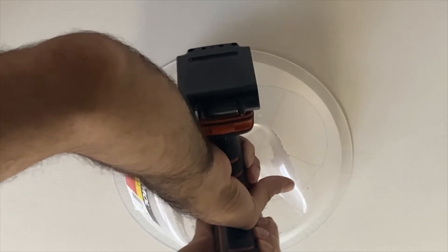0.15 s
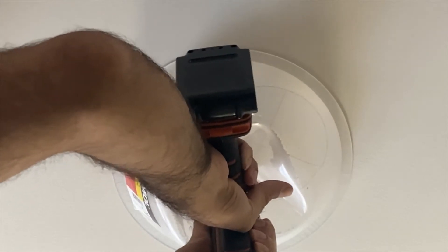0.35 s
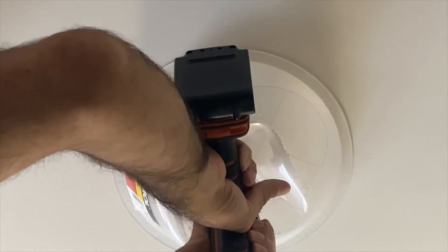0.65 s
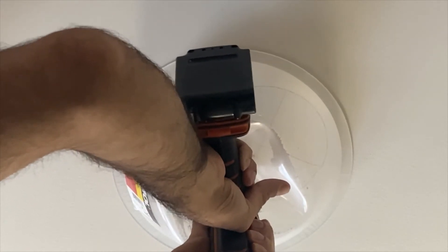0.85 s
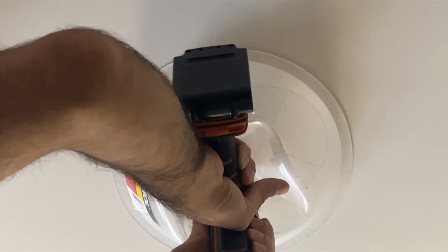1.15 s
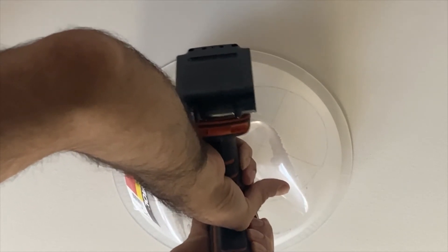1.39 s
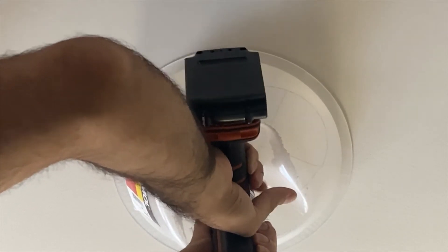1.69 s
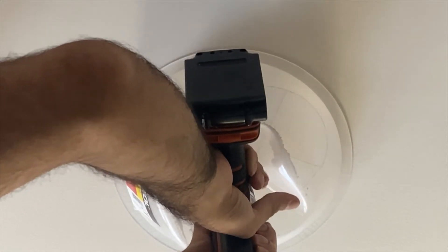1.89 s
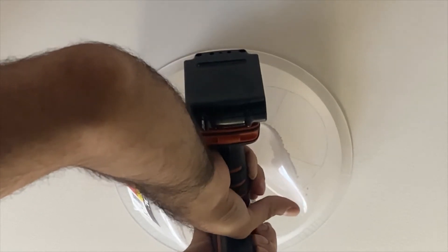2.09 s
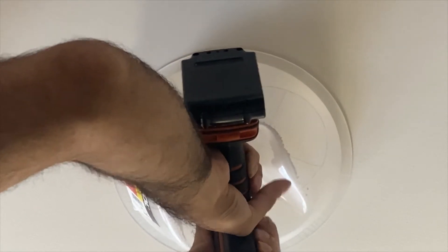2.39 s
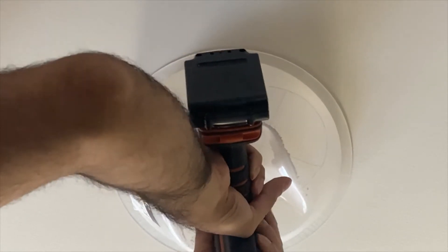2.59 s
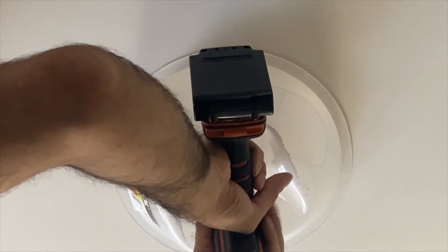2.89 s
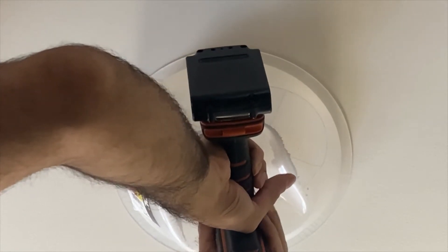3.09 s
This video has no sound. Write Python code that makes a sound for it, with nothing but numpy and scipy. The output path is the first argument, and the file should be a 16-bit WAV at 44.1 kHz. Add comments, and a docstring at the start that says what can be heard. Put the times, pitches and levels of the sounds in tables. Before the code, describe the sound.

A cordless drill grinds a hole saw through plasterboard, stops abruptly, then the tool ticks and clacks.

```python
"""Hole saw in a plasterboard ceiling

A cordless drill in a small hard room sags, picks up speed, grinds on and is braked; mono microphone.
Random tooth strikes make the scrape and ring the saw cup; tones locked to the shaft make the motor.
Short rattles ring the plastic as the tool ticks in the hand, and its switch clacks once.
Sparse decaying echoes give the room; shaped noise and fuzzy tones give its air and appliance hum."""
import sys
import numpy as np
from scipy import signal
from scipy.fft import rfft, irfft
from scipy.io import wavfile
from scipy.ndimage import uniform_filter1d

SR = 44100
rng = np.random.default_rng(int(sys.argv[2]) if len(sys.argv) > 2 else 0)


def output_pcm(signal):
    """Save a mono or channel-first signal as 16-bit PCM at the path in sys.argv[1].

    Samples are clipped to [-1, 1] before scaling.
    """
    pcm = np.clip(np.atleast_2d(signal).T, -1, 1) * 32767
    wavfile.write(sys.argv[1], SR, np.round(pcm).astype(np.int16))


def attenuation_scalar(level_db):
    """Turn a level in dB into a linear amplitude multiplier (20 dB per decade)."""
    decades = np.asarray(level_db, float) / 20
    return 10 ** decades


N = 143325
t = np.arange(N) / SR


def evened(x):
    """Scales x to rms 1."""
    return x / np.sqrt(np.mean(x ** 2) + 1e-20)


def read(points, hz):
    """Reads a spectrum table along a logarithmic frequency axis."""
    f, value = np.transpose(points)
    return np.interp(np.log(hz + 1), np.log(f + 1), value)


def curve(rows, at):
    """Reads a table of time and value along straight lines."""
    return np.interp(at, *np.transpose(rows))


def resonate(x, hz, width):
    """A resonance of the given width in Hz: shifts the curve hz down to zero, smooths, and shifts back."""
    turn = np.exp(2j * np.pi * np.cumsum(hz * np.ones(len(x))) / SR)
    r = np.exp(-np.pi * abs(width) / SR)
    return 2 * (turn * signal.lfilter([1 - r], [1, -r], x / turn)).real


def slow(top_hz):
    """Slow chance of rms 1: sines from 0.8 Hz to top_hz, weaker as they quicken."""
    rates = np.geomspace(.8, top_hz, num=16)
    return evened(sum(np.sin(2 * np.pi * (f * t + rng.random())) / np.sqrt(f) for f in rates))


def colour(x, points, db_field=0, size=512):
    """Shapes x by a spectrum and an optional dB field over frequency and time."""
    overlap = size * 3 // 4
    hz, at, z = signal.stft(x, SR, nperseg=size, noverlap=overlap)
    field = db_field(hz[:, None], at) if callable(db_field) else 0
    gain = attenuation_scalar(read(points, hz)[:, None] + field)
    return signal.istft(z * gain, SR, nperseg=size, noverlap=overlap)[1][:len(x)]


def drill():
    """Motor tones and cutting noise share one shaft speed and die away together under the brake."""
    # motor shaft speed: t/s, f/Hz
    shaft = [(0, 259.6), (.08, 198.1), (.12, 201.7), (.162, 289.1), (.22, 361.6), (.7, 367.6), (.9, 360),
             (1.1, 357), (1.3, 359.8), (1.575, 364.3), (1.63, 278)]
    stop_s, brake_s = 1.582, 0.018  # brake onset, time constant of the fading level
    reduction, turn_start = 36., 0.36  # motor turns per saw turn, saw angle before the start (turns)
    speed = curve(shaft, t)
    saw = turn_start + np.cumsum(speed) / SR / reduction
    on = np.exp(-np.maximum(t - stop_s, 0) / brake_s)
    return motor(speed, saw) * on, cutting(speed, saw) * on


def cutting(speed, saw):
    """Dense tooth strikes give a wide scrape and ring the saw cup; the bite varies round each turn."""
    # cutting effort: t/s, level/dB
    effort = [(0, -23.5), (.09, -28), (.18, -24.5), (.3, -25.5), (.4, -25.5), (.5, -25), (1.12, -24.5),
              (1.27, -25), (1.4, -24), (1.5, -24), (1.57, -26.5)]
    # spectrum of teeth scraping plaster: f/Hz, relative level/dB
    grind = [(53, -54), (90, -28.5), (176, -8.5), (296, -8.5), (438, -5), (606, -11), (721, -4.5),
             (1160, -4.5), (1750, 1.5), (2530, -2), (3150, 1), (4550, -7.5), (10400, -7.5), (13000, -11.5),
             (16000, -24)]
    # resonances of board, saw cup and dust bowl: f/Hz, width/Hz, relative level/dB
    body = [(179, 14, -7), (3060, 140, -5.5), (3400, 110, 4), (5165, 460, 3), (5390, 57, -5.5),
            (6270, 140, 2.5), (6610, 110, -6.5), (10400, 560, -3)]
    scrape_db, cup_db, turn_depth_db = -1, -10, 0.68
    teeth_per_s, tooth_spread_db = 10000, 2  # mean strike rate, scale of the random strike levels
    shallow_db, sink_s = 4, 0.3  # the cup rings less until the saw has sunk in
    patchy_db = 1.5
    dull_hz, dull_db_per_octave = 3960, 7  # treble lost above dull_hz if the motor stood still

    force = attenuation_scalar(tooth_spread_db * np.minimum(rng.exponential(1, N), 5))
    hit = rng.random(N) < teeth_per_s / SR
    strikes = force * rng.choice([-1., 1.], N) * hit

    def field(hz, at):
        """Patchy grain in time and frequency, with duller treble as the motor slows."""
        grain = rng.standard_normal((len(at), len(hz)))
        grain = uniform_filter1d(grain, size=9, axis=0)
        patches = evened(uniform_filter1d(grain, size=10, axis=1)).T
        slack = 1 - np.interp(at, t, speed) / speed.max()
        return patchy_db * patches - dull_db_per_octave * slack * np.log2(1 + hz / dull_hz)

    scrape = evened(colour(strikes, grind, field, size=1024))
    cup = 0
    for hz, width, db in body:
        wandering_hz = hz * (1 + 0.011 * slow(9.7))
        cup = cup + attenuation_scalar(db + 2.8 * slow(20)) * evened(resonate(strikes, wandering_hz, width))
    cup_level = attenuation_scalar(cup_db - shallow_db * np.exp(-t / sink_s))
    bite = attenuation_scalar(curve(effort, t) + turn_depth_db * np.sin(2 * np.pi * saw))
    return bite * (attenuation_scalar(scrape_db) * scrape + cup_level * evened(cup))


def motor(speed, saw):
    """Shaft orders, gear whines and a moan follow the speed; the ceiling panel shudders once per saw turn."""
    # how the grip lets the housing hum: t/s, shaft order level/dB, second order level/dB
    housing = [(0, -41.5, -54), (.07, -46, -61.5), (.135, -46.5, -59.5), (.165, -31.5, -57),
               (.195, -50, -51), (.23, -34, -37.5), (.35, -43, -39), (.41, -47.5, -50), (.48, -41.5, -41),
               (.8, -42.5, -41), (.88, -44, -50.5), (1.0, -44.5, -37), (1.08, -32.5, -43),
               (1.14, -39.5, -60.5), (1.301, -45, -51), (1.4, -42.5, -51.5), (1.53, -49, -37),
               (1.6, -46, -48.5)]
    # gear mesh whines: multiple of shaft speed, mean level at full speed/dB, width of each pass/Hz
    mesh = [(4.7, -43.5, 190), (5.03, -42, 110), (7.53, -36.5, 67), (8.55, -42.5, 62), (9.6, -41, 53)]
    # the whines between orders 7 and 8 come and go: t/s, added level/dB
    whine = [(.2, -3), (.55, 3), (.9, -2), (1.05, 5.5), (1.2, 4), (1.32, -5.5), (1.42, 0.5), (1.55, -5.5)]
    # moan at full speed, at the top of its swell: t/s, level/dB
    moan_level = [(.15, -38.5), (.3, -32), (.5, -35), (.65, -35.5), (1.08, -35), (1.35, -36), (1.5, -35.5)]
    # panel shudder at the top of its swell: t/s, level/dB
    shudder = [(0, -64.5), (.9, -76), (1.15, -51), (1.35, -46), (1.6, -44.5)]
    waver_db, speed_jitter, db_per_octave_of_speed = 2.5, .0015, 14.5  # jitter: rms share of speed
    moan_order, moan_sweep, moan_depth_db = 1.21, 0.066, 17.5  # sweep: share of the moan's pitch
    panel_hz, panel_width_hz = 63.5, 37

    turns = np.cumsum(speed * (1 + speed_jitter * slow(28))) / SR
    at, first, second = np.transpose(housing)
    out = 0
    for order, db in enumerate([first, second], start=1):
        level = attenuation_scalar(np.interp(t, at, db) + waver_db * slow(25))
        out = out + np.sqrt(2) * level * np.sin(2 * np.pi * order * turns)

    fast = attenuation_scalar(db_per_octave_of_speed * np.log2(speed / speed.max()))
    for order, db, width in mesh:
        level = attenuation_scalar(db + slow(9.8) + (7 < order < 8) * curve(whine, t))
        once = resonate(rng.standard_normal(N), order * speed, width)
        out += fast * level * evened(resonate(once, order * speed, width))

    # the pitch rises and the level swells once per saw turn
    moan = np.cumsum(moan_order * speed * (1 - moan_sweep * np.cos(np.pi * (saw % 1)))) / SR
    swell = np.sin(np.pi * saw) ** 2 - 1
    level = attenuation_scalar(curve(moan_level, t) + moan_depth_db * swell)
    out += fast * np.sqrt(2) * level * np.sin(2 * np.pi * moan)

    once = resonate(rng.standard_normal(N), panel_hz, panel_width_hz)
    panel = evened(resonate(once, panel_hz, panel_width_hz))
    return out + attenuation_scalar(curve(shudder, t) + 6 * swell) * panel


def ticks():
    """Rattles of clicks ring the plastic housing and snap wide; the switch latch's blows ring it cleanly."""
    # plastic ticks: t/s, relative level/dB, decay time constant/s, added snap level/dB
    tick_rows = [(2.15, -68.5, .012, 17), (2.391, -67, 0.018, 16), (2.416, -61, .03, -3),
                 (2.483, -69.5, .01, 14), (2.868, -47.5, 0.011, -2.5), (2.9235, -28.5, 0.011, 2.5),
                 (2.95, -36, 0.013, -2), (2.99, -47.5, 0.011, 1.5), (3.061, -50.5, .012, 4)]
    # modes of the plastic: f/Hz, relative level/dB, t60/s
    plastic = [(1085, -6.5, 0.016), (1656, -4, 0.025), (2350, -8, 0.012), (2930, 6, 0.0081),
               (3500, -4, .008)]
    # spectrum of the snap: f/Hz, relative level/dB
    snap_colour = [(300, -25), (1500, -4.5), (3200, -2.5), (4200, -10.5), (8000, -16), (16000, -26.5)]
    # the switch latch strikes and bounces: t/s, peak level/dB
    latch = [(2.926, -23.5), (2.9293, -24.5), (2.9337, -29.5), (2.9423, -33)]
    rattle_per_s, ring_db, crack_db = 2900, -10.5, -5
    rise_share = 0.29  # rise time as a share of the decay time constant

    rattle, bright = np.zeros(N), np.zeros(N)
    clicks = evened(rng.standard_normal(N) * (0.35 + (rng.random(N) < rattle_per_s / SR) * 2))
    for s, db, length, snap_db in tick_rows:
        u = np.maximum(t - s, 0) / length
        shape = attenuation_scalar(db) * np.minimum(u / rise_share, 1) * np.exp(-u)
        rattle += shape
        bright += attenuation_scalar(snap_db) * shape

    u = t[:2000]
    ring = sum(attenuation_scalar(db - 60 * u / t60) * np.sin(2 * np.pi * hz * u) for hz, db, t60 in plastic)
    blows = np.zeros(N)
    for s, db in latch:
        blows[round(s * SR)] = attenuation_scalar(db) / abs(ring).max()
    clack = signal.oaconvolve(blows, ring)[:N]
    rung = signal.oaconvolve(rattle * clicks, ring / np.linalg.norm(ring))[:N]
    snap = bright * evened(colour(clicks, snap_colour, size=128))
    return clack + attenuation_scalar(ring_db) * rung + attenuation_scalar(crack_db) * snap


def room(x):
    """Three sparse tails, each band dying at its own speed, fed in turn as hands and tool move."""
    # reverberation: f/Hz, t60/s
    decay = [(150, 0.62), (500, 0.77), (2000, 0.37), (5000, 0.37), (12000, 0.19)]
    shift_hz = 2.52  # how fast the feed moves between the tails
    at, out = np.arange(160, SR - 20, 20), 0  # one echo in every 20 samples
    for k in range(3):
        taps = np.zeros(SR)
        taps[at + rng.integers(0, 20, len(at))] = rng.choice([-1., 1.], len(at))
        hz, u, z = signal.stft(taps, SR, nperseg=256)
        tail = signal.istft(z * attenuation_scalar(-60 * u / read(decay, hz)[:, None]), SR, nperseg=256)[1]
        # the squares of the three feeds add up to 1
        feed = np.sqrt(2 / 3) * np.cos(np.pi * (shift_hz * t + k / 3))
        out = out + signal.fftconvolve(feed * x, tail / np.linalg.norm(tail))[:N]
    return out


def background():
    """Low room air as shaped noise, and appliance hum as steady tones mixed with narrow noise."""
    # spectrum of the room air: f/Hz, relative level/dB
    air = [(20, -20.5), (53, -4), (216, -6.5), (422, -13.5), (660, -16.5), (1610, -24.5), (1860, -22),
           (2080, -24.5), (12100, -45), (16000, -62.5)]
    # appliance hum: f/Hz, level before steady and fuzzy parts are mixed/dB
    hum = [(59.2, -53), (118.4, -61.5), (204.6, -58), (236.9, -66), (409.1, -65.5), (629.8, -69.5),
           (1873, -71.5)]
    air_db, hum_width_hz, hum_fuzz = -58, 7, .6  # hum_fuzz: amplitude share of the noise
    out = attenuation_scalar(air_db + 1.5 * slow(6.7)) * evened(colour(rng.standard_normal(N), air, size=4096))
    for hz, db in hum:
        fuzz = evened(resonate(rng.standard_normal(N), hz, hum_width_hz))
        steady = np.sqrt(2) * np.sin(2 * np.pi * (hz * t + rng.random()))
        out += attenuation_scalar(db) * ((1 - hum_fuzz) * steady + hum_fuzz * fuzz)
    return out


def scene():
    """Drill and ticks, near and through the room, over the background; both channels alike."""
    drill_wet_db, tone_wet_db, tick_wet_db = -5, -15, -8
    (tones, cut), small = drill(), ticks()
    share = attenuation_scalar(drill_wet_db)
    wet = room(share * cut + attenuation_scalar(tone_wet_db) * tones + attenuation_scalar(tick_wet_db) * small)
    near = np.sqrt(1 - share ** 2) * cut + tones + small
    mono = near + wet + background()
    return np.array([mono, mono])


def thin(x, s, length, hz, count):
    """For a moment only the strongest few spectral lines above hz stay; the sound below is untouched."""
    thin_db, tone_lift_db = -25.5, 0.5
    at = slice(round(s * SR) - 512, round(s * SR) + 512)
    z, f = rfft(x[:, at]), np.fft.rfftfreq(1024, 1 / SR)
    rank = abs(z[0]) * np.sqrt(f) * (f > hz)
    strongest = rank > np.sort(rank)[-count - 1]
    gain = np.where(strongest, attenuation_scalar(tone_lift_db), np.where(f > hz, attenuation_scalar(thin_db), 1))
    fade = np.exp(-((t[at] - s) / length) ** 4)
    out = x.copy()
    out[:, at] += fade * (irfft(z * gain) - x[:, at])
    return out


def band_limit(x):
    """A steep low-pass at the top of the band."""
    return signal.sosfilt(signal.butter(12, 15750, fs=SR, output="sos"), x)


def record(dry):
    """The sound thins briefly a few times on its way to the finished mix."""
    # brief thinnings: t/s, half length/s, lower edge f/Hz, number of spectral lines left
    dips = [(.8645, .0055, 60, 16), (1.0785, .006, 550, 14), (2.915, .0075, 4000, 0),
            (2.951, .0075, 4000, 1)]
    mix = dry
    for row in dips:
        mix = thin(mix, *row)
    return band_limit(mix)


dry = scene()
out = record(dry)
output_pcm(out)
```